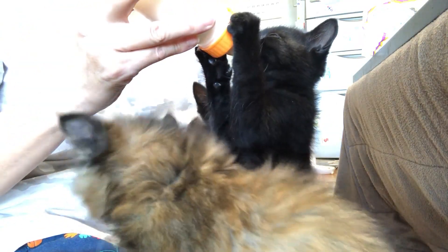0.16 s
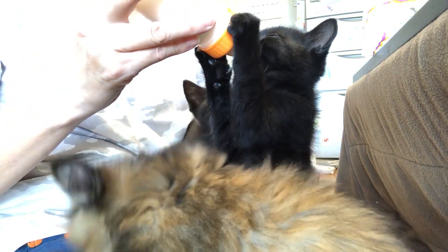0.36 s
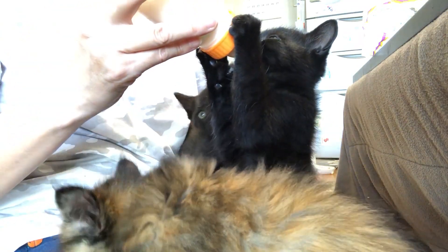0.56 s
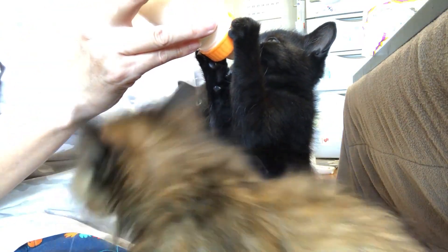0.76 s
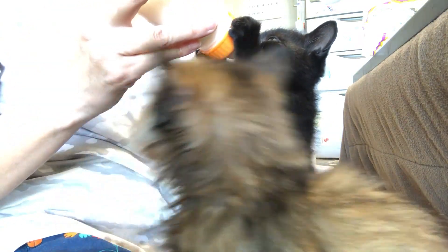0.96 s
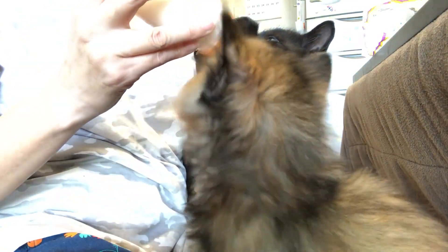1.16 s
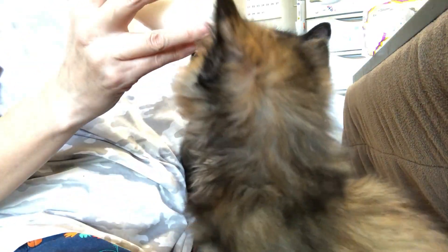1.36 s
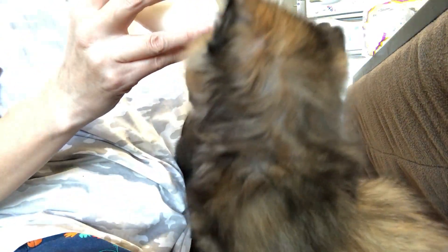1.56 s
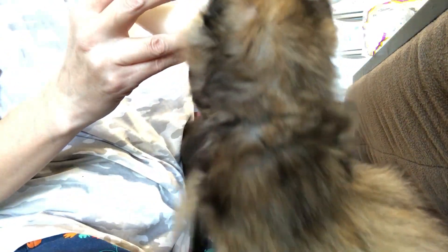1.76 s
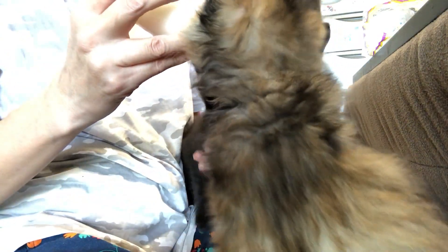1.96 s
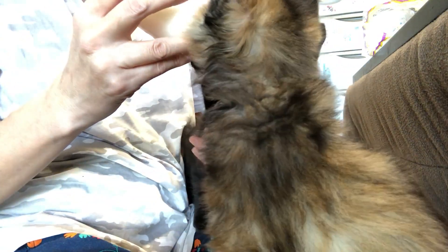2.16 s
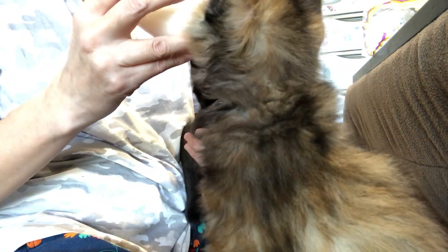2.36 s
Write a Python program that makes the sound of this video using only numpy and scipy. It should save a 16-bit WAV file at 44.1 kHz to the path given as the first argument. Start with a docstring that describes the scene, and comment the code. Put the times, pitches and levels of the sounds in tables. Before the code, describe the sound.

One thin kitten meow is the main sound, heard up close indoors. Small wet suckling clicks and soft pawing on cloth come first, then fur rubs and bumps the microphone, then the meow, over a low room rumble.

```python
"""Kittens crowd round a feeding bottle on a lap, close to the microphone, in a quiet room.
First, wet mouths click and squeak as they suck, while paws stir the cloth and thud softly.
At half a second, fur brushes and snags on the microphone with a bump, then a body slides away.
At 1.3 seconds, one thin meow starts open-mouthed and closes to a nearly pure tone.
A few last clicks follow. A low room rumble lies under it all."""
import sys
import numpy as np
from scipy import signal
from scipy.fft import rfft, irfft
from scipy.io import wavfile
from scipy.ndimage import uniform_filter1d

SR = 44100
rng = np.random.default_rng(int(sys.argv[2]) if len(sys.argv) > 2 else 0)


def generate_wav(sig):
    """Save sig (samples, or channels by samples) to the path in sys.argv[1] as 16-bit PCM at SR."""
    pcm = np.round(np.clip(np.atleast_2d(sig).T, -1, 1) * 32767).astype(np.int16)
    wavfile.write(sys.argv[1], SR, pcm)


N = 110250
T = np.arange(N) / SR


def meow():
    """Vocal folds buzz through a throat whose tone changes as the mouth closes; the start is rough."""
    # the tune of the meow: time_s, pitch_hz
    tune = [(1.315, 1266), (1.344, 1177), (1.42, 1105), (1.452, 1097), (1.466, 1126), (1.55, 1102),
            (1.6, 1135), (1.65, 1123), (1.708, 1144), (1.721, 1160), (1.75, 1119), (1.763, 1155),
            (1.778, 1112), (1.794, 1093), (1.808, 1112), (1.835, 1115), (1.857, 1153), (1.87, 1030)]
    # effort and mouth shape: time_s, level_db, opening (0 to 1), brightness_db_per_octave
    mouth = [(1.32, -68, 0.9, 1), (1.325, -37.5, 1, 0), (1.365, -42, 0.98, 1.5), (1.41, -41, 1, -0.5),
             (1.453, -41, 0.97, -9.5), (1.467, -47, 0.83, 1), (1.5, -49.5, 0.32, 5.5), (1.565, -59, 0.2, 8),
             (1.6, -49, 0.01, 8.5), (1.72, -47.5, 0.06, -12), (1.768, -47, 0.1, -3),
             (1.809, -49, 0.32, -16), (1.857, -46.5, 0.01, -9), (1.876, -53, 0.42, 1)]
    # what the throat lets through with the mouth open: pitch_hz, gain_db
    open_tone = [(1130, -21.5), (2300, -5.5), (3450, -17), (4600, -30), (5700, -33.5), (7200, -39),
                 (8300, -41), (10000, -41.5), (12500, -43), (15000, -56)]
    # the same with the mouth nearly shut: pitch_hz, gain_db
    shut_tone = [(1130, 1), (2260, -18.5), (3400, -36.5), (4600, -41), (7000, -57), (11000, -63),
                 (15000, -66)]
    # the tone of the airy rasp: pitch_hz, gain_db
    rasp_tone = [(700, -30), (1500, 6), (2500, -9), (3200, -0.5), (6000, -7.5), (10000, -9), (12000, -22),
                 (15000, -29)]
    rasp_db, catch_db, catch_s = -32.5, -58, 0.016
    ring_start_hz, climb_hz, climb_s, ring_width_hz, ring_db = 8740, 3600, 0.12, 850, 12
    age = np.maximum(T - mouth[0][0], 0)
    catch = np.exp(-age / catch_s)  # the voice catches briefly as it starts
    hz = curve(tune) * (1 + (0.0057 + 0.008 * catch) * wobble(590))
    phase = 2 * np.pi * np.cumsum(hz) / SR
    opening, brightness = np.clip(curve(mouth, column=2), 0, 1), curve(mouth, column=3)
    ring_hz = ring_start_hz + climb_hz * (1 - np.exp(-age / climb_s))  # a high throat ring climbs
    voice = 0
    for k in range(1, 14):  # tones at whole multiples of the pitch
        db = opening * gain_at(open_tone, k * hz) + (1 - opening) * gain_at(shut_tone, k * hz)
        db += brightness * np.log2(max(k / 2, 1))
        db += ring_db / (1 + ((k * hz - ring_hz) / ring_width_hz) ** 2)
        db += 0.9 * np.sqrt(k) * wobble(210)  # higher tones flicker more
        voice += np.sqrt(2) * undb(db) * np.sin(k * phase)
    rasp = colour(rng.standard_normal(N), rasp_tone) * (1 + np.cos(phase) / 2)
    cry = (voice + undb(rasp_db) * rasp) * undb(curve(mouth))
    return (cry + undb(catch_db) * catch * rasp) * gate(mouth, edge_s=0.0022)


def clicks():
    """Tongue and teat part with a snap that rings the small space inside the mouth."""
    # wet clicks: start_s, level_db, pitch_hz, width_hz, fade_s
    smacks = [(0.072, -49, 1150, 900, .005), (0.145, -59.5, 2850, 900, 0.023),
              (.196, -50.5, 4540, 4400, 0.0015), (0.2088, -46, 3240, 1680, 0.0017),
              (.265, -53, 3630, 2000, .0015), (.2735, -49.5, 3770, 2120, 0.0015),
              (.283, -64, 4470, 2500, .001), (0.337, -57, 3620, 1200, 0.0041),
              (0.391, -58.5, 4400, 1480, 0.0056), (0.394, -49, 1600, 900, 0.0012),
              (1.116, -59.5, 4860, 1600, 0.0022), (1.194, -51, 2480, 1970, 0.0039),
              (1.203, -63, 2500, 2000, .002), (1.244, -58.5, 12300, 5000, 0.006),
              (1.2479, -50, 6100, 2000, 0.0021), (1.258, -44, 2520, 1180, 0.001),
              (1.2615, -53, 4230, 2510, 0.0031), (1.383, -64, 14500, 2500, .004),
              (1.568, -58.5, 2220, 1590, 0.017), (1.582, -64.5, 14300, 2500, 0.0044),
              (1.599, -59, 4200, 1350, 0.0037), (1.825, -57, 4100, 900, 0.0014),
              (1.884, -71, 5500, 4000, 0.028), (1.95, -65, 4000, 1500, 0.0021),
              (2.1303, -59.5, 3000, 2000, 0.0017), (2.131, -56, 695, 596, 0.0049),
              (2.3058, -59, 2880, 800, 0.0049), (2.329, -61, 4340, 1600, 0.0021)]
    snap_db = -19
    out = np.zeros(N)
    for start, db, hz, width, fade_s in smacks:
        noise = rng.standard_normal(N)
        ring = unit(resonate(resonate(noise, hz, width), hz, 2 * width))
        out += undb(db) * burst(start, fade_s) * (ring + undb(snap_db) * noise)
    return out


def squeaks():
    """Air squeezed past wet lips makes short, rough, slightly falling chirps."""
    # sucking squeaks: start_s, length_s, pitch_hz, level_db
    sucks = [(.195, 0.0045, 4820, -48), (0.281, .014, 980, -44), (0.316, 0.0084, 1018, -44.5),
             (0.324, 0.0072, 930, -48), (.358, 0.0069, 900, -42.5), (0.389, 0.013, 4580, -55.5),
             (0.401, 0.0094, 1040, -53), (0.898, 0.021, 880, -53.5), (0.943, 0.0092, 850, -54),
             (1.185, 0.006, 3025, -44.5), (1.873, 0.0092, 1534, -54.5), (1.875, 0.0083, 800, -51)]
    chirps = sum(undb(db) * blip(start, length, hz, glide=-0.11) for start, length, hz, db in sucks)
    return chirps * (1 + 0.3 * wobble(1000))


def brush():
    """Fur drags over the microphone: a rustle of tiny slips, a fine hiss and a dull bump."""
    # how loudly the fur rubs: time_s, level_db
    fur_level = [(.47, -69), (.505, -54.5), (.545, -56), (.549, -41), (.582, -40), (.614, -45),
                 (.627, -41.5), (.66, -46), (.71, -47.5), (.79, -52.5), (.81, -60), (.87, -60.5),
                 (.97, -80), (1.04, -94)]
    # the tone of the rubbing: pitch_hz, gain_db
    fur_tone = [(150, -14), (250, -5.5), (448, -5), (488, -4.5), (675, -9), (935, -6.5), (1090, -7.5),
                (1990, -13), (2700, -17), (3680, -16.5), (15000, -44)]
    # how loudly the hairs hiss: time_s, level_db
    hair_level = [(.495, -89), (.506, -54), (.535, -62), (.555, -49), (.61, -61), (.63, -50), (.68, -68),
                  (.783, -85), (.79, -55.5), (.8, -94)]
    # the tone of the hiss: pitch_hz, gain_db
    hair_tone = [(3000, 7), (6000, 4.5), (12500, -3), (15500, 1.5)]
    # a body knocking the microphone: time_s, level_db
    bump_level = [(.49, -58), (.55, -52), (.578, -44.5), (.61, -42.5), (.64, -45), (.72, -48.5),
                  (.8, -53.5), (.92, -61.5)]
    # the deep tone of that knock: pitch_hz, gain_db
    bump_tone = [(25, -32), (50, -17), (72, 2.5), (95, -12), (155, 0), (215, 0), (280, -18), (500, -13),
                 (1500, -72)]
    slips_per_s, spread_db, flutter_db = 3000, -0.5, 1.9
    rustle = colour(grains(slips_per_s, spread_db), fur_tone)
    rustle *= undb(curve(fur_level) + flutter_db * wobble(60)) * gate(fur_level, edge_s=0.025)
    hiss = colour(grains(slips_per_s, spread_db), hair_tone)
    hiss *= undb(curve(hair_level)) * gate(hair_level, edge_s=0.01)
    bump = colour(rng.standard_normal(N), bump_tone)
    bump *= undb(curve(bump_level)) * gate(bump_level, edge_s=0.055)
    return rustle + hiss + bump


def snags():
    """Tufts of fur catch on the microphone's case and snap free in short crunches."""
    # tufts letting go: start_s, level_db, fade_s
    tufts = [(0.55, -39, 0.0068), (0.567, -42.5, 0.013), (.585, -46, .004), (.787, -51, .004)]
    # the tone of the crunch: pitch_hz, gain_db
    crunch_tone = [(150, -12), (500, -6), (900, 3), (2100, 0), (2800, -16), (4500, -6), (7500, -17),
                   (15000, -39)]
    loudness = sum(undb(db) * burst(start, fade_s) for start, db, fade_s in tufts)
    return loudness * colour(grains(per_s=3000, spread_db=2.6), crunch_tone)


def thuds():
    """Paws and bodies knock softly against the lap and the microphone."""
    # soft knocks: start_s, length_s, pitch_hz, level_db
    knocks = [(.195, .035, 200, -50), (.348, .024, 190, -47), (.627, .02, 490, -40), (1.84, .045, 155, -52)]
    return sum(undb(db) * blip(start, length, hz, glide=-0.19) for start, length, hz, db in knocks)


def drag():
    """A body slides away with a dull scuff."""
    # how loudly the body scuffs: time_s, level_db
    scuff_level = [(.64, -80), (.71, -58), (.8, -55.5), (.87, -57.5), (.95, -64.5), (1.05, -67)]
    # the tone of the scuff: pitch_hz, gain_db
    scuff_tone = [(150, -10), (300, 7), (470, 5.5), (650, -3.5), (900, -3), (1400, -11), (3000, -49)]
    scuff = colour(grains(per_s=1600, spread_db=4.6), scuff_tone)
    return scuff * undb(curve(scuff_level)) * gate(scuff_level, edge_s=0.029)


def cloth():
    """Paws stir the cloth in soft swells, with faint stray ticks throughout."""
    # paw movements: start_s, length_s, level_db
    stirs = [(0.064, 0.061, -60), (0.11, 0.1, -57.5), (0.175, 0.11, -61.5), (0.328, 0.044, -53.5),
             (0.356, 0.077, -58), (1.033, 0.071, -64.5), (1.19, 0.1, -72.5), (1.861, 0.047, -62.5)]
    # the tone of the cloth: pitch_hz, gain_db
    cloth_tone = [(200, 15.5), (800, 9), (2600, 3.5), (5500, -5.5), (9000, -25), (15000, -23)]
    swell = sum(undb(db) * np.sin(np.pi * progress(start, length)) for start, length, db in stirs)
    rustle = colour(grains(per_s=3000, spread_db=3.9), cloth_tone)
    ticks = colour(grains(per_s=160, spread_db=4), cloth_tone)
    return swell * rustle + undb(-75) * ticks


def room(x):
    """A furnished room adds a short, soft echo to a sound."""
    # the tone of the echo: pitch_hz, gain_db
    echo_tone = [(200, -4), (2500, 6.5), (12000, 3.5)]
    echo_s, echo_db = 0.36, -15.5
    fade = np.exp(-np.log(1000) * T / echo_s) * (T > 0.004)  # falls 60 dB in echo_s
    tail = colour(rng.standard_normal(N), echo_tone) * fade
    tail /= np.sqrt(np.sum(tail ** 2))
    return x + undb(echo_db) * signal.fftconvolve(x, tail)[:N]


def rumble():
    """The room rumbles at a few low pitches, with a faint hiss on top."""
    # the tone of the quiet room: pitch_hz, gain_db
    room_tone = [(25, -46), (42, -3), (56, -14.5), (73, -1.5), (88, -7), (110, 5), (130, -2), (152, 4.5),
                 (190, -2.5), (240, -5.5), (368, -13.5), (614, -17), (895, -16.5), (1450, -22),
                 (1850, -24.5), (2130, -20.5), (2600, -30.5), (3830, -32), (5580, -35), (9000, -41.5),
                 (15500, -42.5)]
    # its slow drift in loudness: time_s, level_db
    room_level = [(0, -56.5), (.3, -56.5), (1.0, -56), (1.6, -58.5), (2.1, -59), (2.5, -58)]
    return colour(rng.standard_normal(N), room_tone) * undb(curve(room_level))


def undb(db):
    """Turn decibels into a number to multiply by."""
    return 10 ** (np.asarray(db) / 20)


def unit(x):
    """Scale a signal to an average strength (rms) of 1."""
    return x / np.sqrt(np.mean(x ** 2) + 1e-30)


def curve(rows, column=1):
    """Join one column of a table with straight lines in time."""
    rows = np.array(rows)
    return np.interp(T, rows[:, 0], rows[:, column])


def gate(rows, edge_s):
    """Stay at 1 between a table's first and last times, and fade outside them."""
    outside_s = np.maximum(rows[0][0] - T, 0) + np.maximum(T - rows[-1][0], 0)
    return np.exp(-outside_s / edge_s)


def gain_at(tone, hz):
    """Look up a tone table's decibels at the given pitches."""
    tone = np.array(tone)
    return np.interp(np.log(np.maximum(hz, 1)), np.log(tone[:, 0]), tone[:, 1])


def colour(x, tone):
    """Shape a signal's lows and highs with a tone table, at strength 1."""
    hz = np.arange(N // 2 + 1) * SR / N
    return unit(irfft(rfft(x) * undb(gain_at(tone, hz)), N))


def resonate(x, hz, width_hz):
    """Make a signal ring around one pitch."""
    return signal.lfilter(*signal.iirpeak(min(hz, SR / 2 - 1), hz / width_hz, fs=SR), x)


def wobble(rate_hz):
    """A smooth random wander of strength 1."""
    span = int(SR / rate_hz)
    smoothed = uniform_filter1d(rng.standard_normal(N), span, mode="wrap")
    return unit(uniform_filter1d(smoothed, span, mode="wrap"))


def grains(per_s, spread_db):
    """Tiny slips of uneven size at random moments."""
    size = undb(spread_db * np.minimum(rng.exponential(size=N), 4))
    return (rng.random(N) < per_s / SR) * size * rng.choice([-1, 1], N)


def burst(start_s, fade_s):
    """Jump to 1, then die away."""
    return (T >= start_s) * np.exp(-np.abs(T - start_s) / fade_s)


def progress(start_s, length_s):
    """Rise from 0 to 1 over the length of an event."""
    return np.clip((T - start_s) / length_s, 0, 1)


def blip(start_s, length_s, hz, glide):
    """A tiny tone that swells and fades while its pitch slides."""
    done = progress(start_s, length_s)
    sliding_hz = hz * (1 + glide * (done - 0.5)) * (done > 0)
    return np.sin(np.pi * done) * np.sin(2 * np.pi * np.cumsum(sliding_hz) / SR)


def scene():
    """Mouths and cloth echo in the room; the rubs, knocks and rumble get no echo."""
    kittens = room(meow() + squeaks() + clicks() + cloth())
    return (kittens + brush() + drag() + thuds() + rumble() + snags())[None]


def record(dry):
    """Cut away the very highest treble."""
    top_hz = 15650
    return signal.sosfilt(signal.ellip(10, 0.2, 70, top_hz, fs=SR, output="sos"), dry)


dry = scene()
out = record(dry)
generate_wav(out)
```